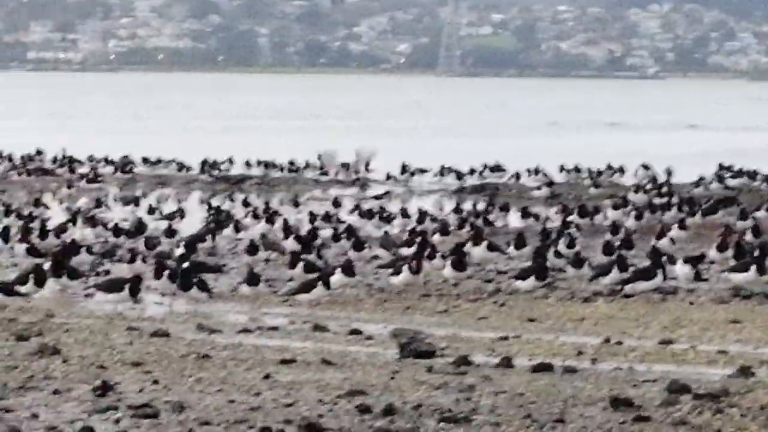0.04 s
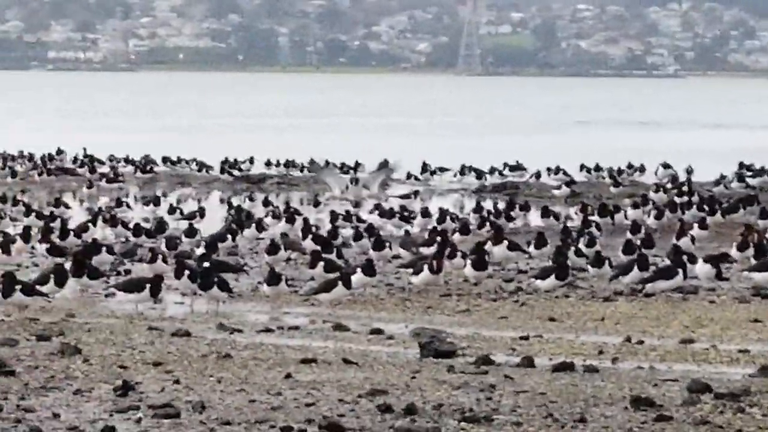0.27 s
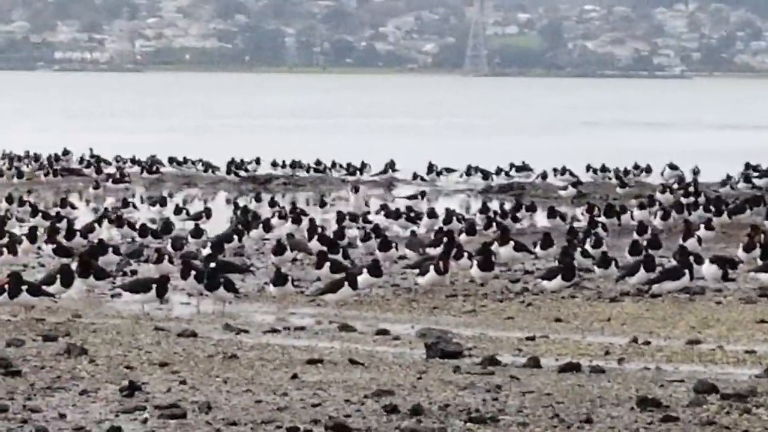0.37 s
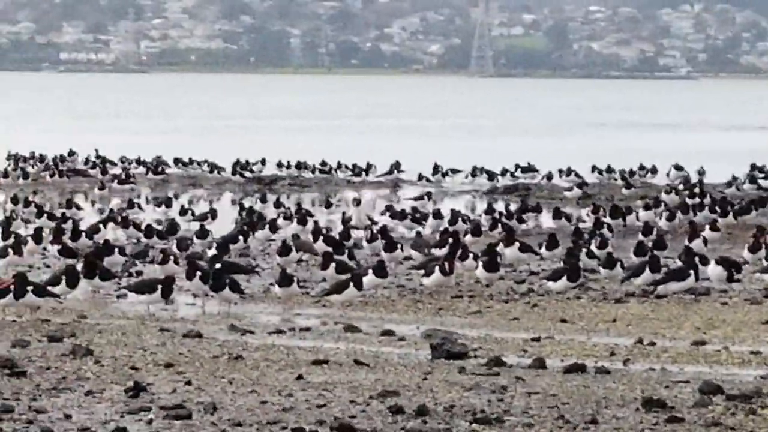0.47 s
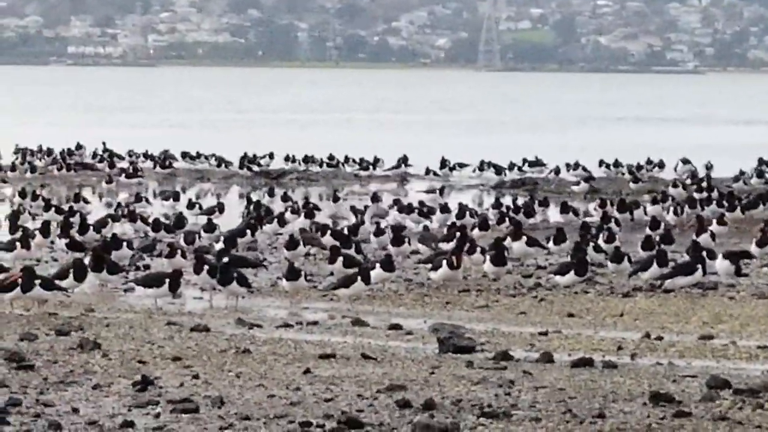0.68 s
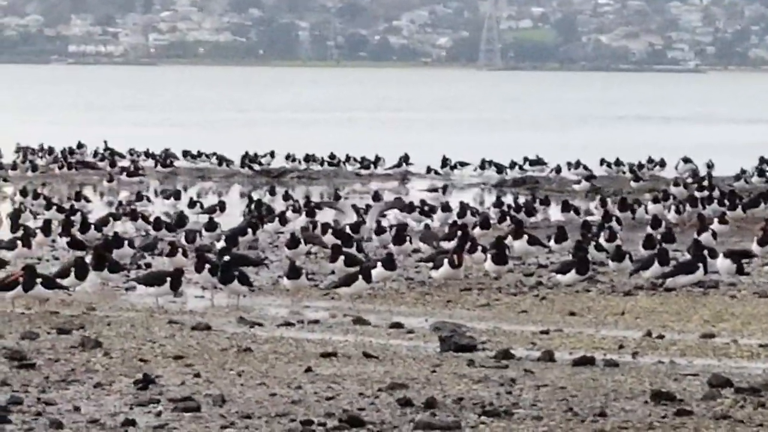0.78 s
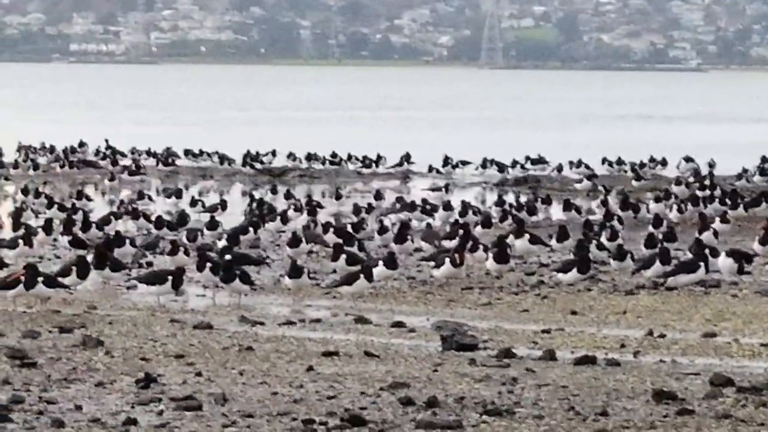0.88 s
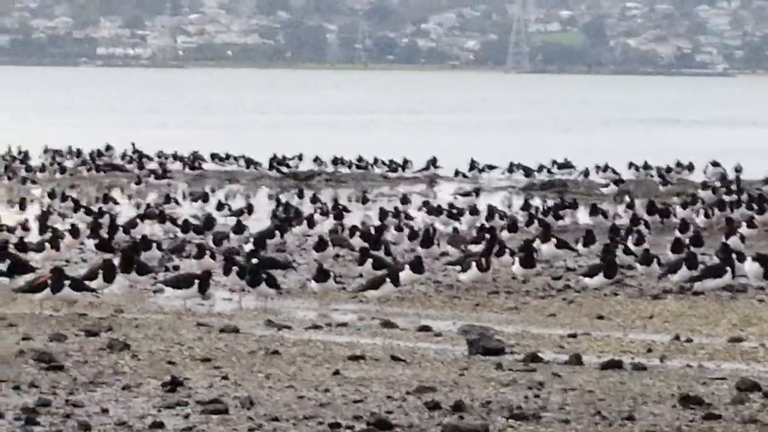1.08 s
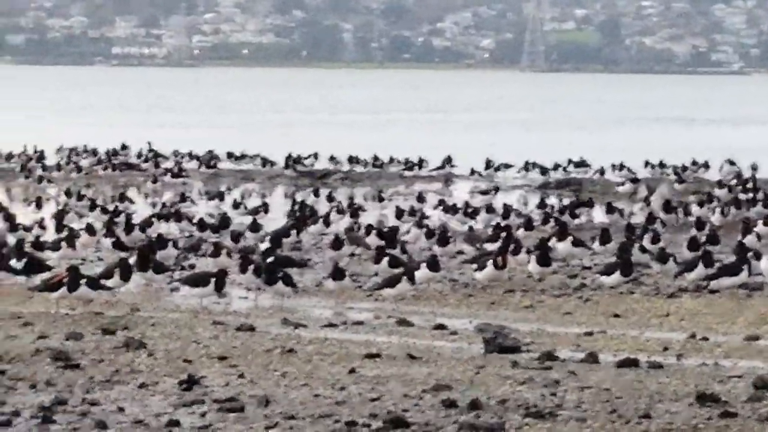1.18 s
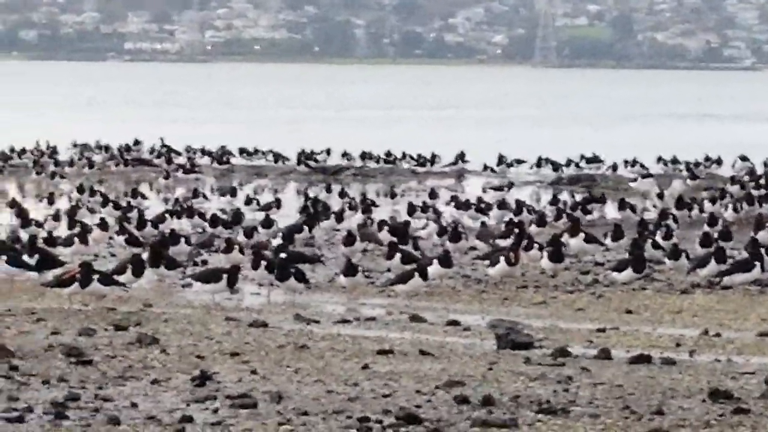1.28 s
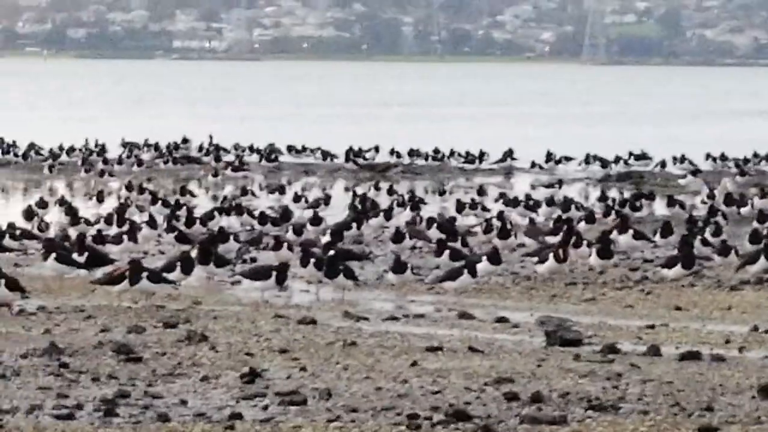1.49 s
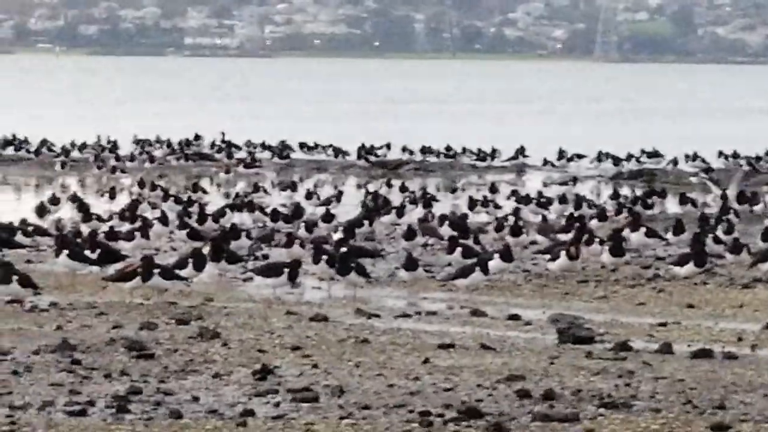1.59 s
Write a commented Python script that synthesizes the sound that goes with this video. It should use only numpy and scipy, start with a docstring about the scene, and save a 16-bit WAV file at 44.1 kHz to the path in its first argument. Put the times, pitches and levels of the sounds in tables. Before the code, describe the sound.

Wading birds pipe a quick run of short, piercing whistles on a stony tidal flat, then one more. Others answer from far out with chirps and lower mewing cries, while light wind rumbles on the microphone.

```python
"""A stony tidal flat with a flock of oystercatchers. Near birds pipe short arched whistles, syrinx
tones that flip up into a high register and drop back. Others answer from far out, with a few lower
mewing cries. The stones scatter each call; bank and shore return a faint long echo. Light wind
rumbles on the microphone over a distant hush, and the camera adds a faint thin whine."""
import sys
import numpy as np
from scipy import signal
from scipy.fft import rfft, irfft, next_fast_len
from scipy.io import wavfile
from scipy.ndimage import uniform_filter1d, map_coordinates

SR = 44100
rng = np.random.default_rng(int(sys.argv[2]) if len(sys.argv) > 2 else 0)


def store_wav(level_fs):
    """Save 16-bit WAV to argv[1]."""
    pcm = np.round(np.clip(np.atleast_2d(level_fs), -1, 1) * 32767)
    wavfile.write(sys.argv[1], SR, pcm.T.astype(np.int16))


N = 72765

# Noise spectra. Each row: frequency in Hz, relative density in dB.
HUSH_SPECTRUM = [(90, 0.5), (170, -2), (215, -6), (300, -1), (400, -16), (650, -13), (2200, -21.5),
                 (6000, -30), (9500, -40), (15000, -45.5)]
WIND_SPECTRUM = [(20, -7), (42, 2), (60, -1), (80, -3), (125, -14), (600, -82)]
# Hush width. Each row: frequency in Hz, left-right correlation.
HUSH_CORRELATION = [(60, 0.82), (250, 0.68), (600, 0.59), (3000, 0.025)]
# Gusts and one lull. Each row: centre in seconds, level over the steady wind in dB.
GUSTS = [(.08, 3.5), (.4, 5.5), (.49, -12), (.96, 6), (1.08, 6), (1.289, 8), (1.379, 8)]
# Distant calls. Each row: start and length in seconds, start, middle and end pitch in Hz, level in dB.
FAR_CALLS = [(-0.02, 0.22, 2100, 2014, 2040, -70), (.018, 0.036, 2150, 2364, 2320, -60.5),
             (.284, 0.027, 1760, 1675, 1500, -62), (.35, 0.038, 1780, 1733, 1500, -59),
             (.59, 0.042, 2000, 2123, 1910, -62), (.744, 0.028, 2740, 2560, 2130, -54),
             (.868, 0.046, 2080, 2670, 2030, -59.5), (1.25, 0.052, 1750, 2478, 1980, -58),
             (1.245, 0.057, 2250, 2043, 2380, -64), (1.622, 0.07, 2200, 2610, 2330, -61)]
MEWS = [(-0.02, .16, 1113, 1071, 1000, -70.5), (.485, 0.058, 1046, 1330, 1560, -64),
        (.545, 0.106, 1585, 1521, 1440, -67), (.63, 0.06, 1470, 1330, 1003, -58),
        (.74, 0.041, 1350, 1292, 1230, -62), (1.244, 0.044, 1170, 1314, 964, -56),
        (1.29, 0.128, 1049, 929, 1082, -69), (1.43, 0.074, 985, 1194, 1185, -56.5),
        (1.488, 0.081, 1095, 1290, 966, -55)]
# One near call each. Each row: time in seconds, pitch in Hz, fundamental and octave levels in dB.
PIP = [(0.224, 1970, -60.5, -76), (0.236, 2787, -39, -44.5), (0.243, 2784, -45, -42.5),
       (0.25, 2740, -43, -45), (0.255, 2640, -66, -63)]
PEEP = [(0.317, 2250, -53, -60), (0.321, 2384, -42, -50), (0.325, 2630, -26.5, -44),
        (0.328, 3024, -42.5, -46.5), (0.338, 3080, -40, -35.5), (0.352, 2970, -41, -43),
        (0.36, 2690, -36.5, -47), (0.364, 2570, -49, -68)]
HELD_PEEP = [(0.386, 1824, -69, -53.5), (0.4, 2201, -41.5, -43.5), (0.409, 2348, -50, -38),
             (0.414, 2842, -35.5, -61), (0.427, 3116, -41, -47.5), (0.48, 3092, -40, -61),
             (0.5, 2986, -38, -52)]
KLEE_OO = [(0.451, 2245, -46, -47.5), (0.459, 2568, -29, -36.5), (0.463, 3114, -40, -45),
           (0.471, 3156, -63, -32), (0.48, 3041, -30.5, -45), (0.487, 2590, -31, -42),
           (0.492, 2476, -38, -43.5), (0.508, 2338, -48.5, -45.5), (0.533, 2332, -44.5, -44),
           (0.547, 2298, -45.5, -47.5), (0.556, 2014, -52, -57)]
YELP = [(0.713, 2064, -60, -72), (0.717, 2130, -41.5, -47), (0.726, 2100, -49.5, -53),
        (0.745, 1643, -51, -67)]
LATE_KLEEP = [(1.028, 1920, -72, -68), (1.046, 2290, -50, -48), (1.058, 2490, -43, -53),
              (1.065, 3110, -38, -58), (1.078, 3260, -41, -55), (1.091, 3305, -47, -57),
              (1.108, 3110, -48, -61), (1.118, 2780, -41, -53), (1.126, 2400, -42, -52),
              (1.135, 2230, -57, -62)]
# Near birds. Each row: call, then in dB: fundamental pan, octave pan, third harmonic re the mean of
# those two harmonics, fall per further harmonic, level sent to the shore at the pitch crest.
NEAR_CALLS = [(PIP, -1.1, 8.2, -21, 25, -51), (PEEP, -3, -3, -19.5, 15, -37.5),
              (HELD_PEEP, -4, 4, -14.5, 4.7, -38.5), (KLEE_OO, -1, -1.1, -11.5, 9.5, -37.5),
              (YELP, 4.6, -2.2, -9.5, 11.6, -46.5), (LATE_KLEEP, -3.6, 7.7, -11, 4.4, -33)]
# Near harmonics 3 to 5. Each row: frequency in Hz, gain in dB.
UPPER_COLOUR = [(6700, -10), (7550, 7.5), (8400, -9), (9600, 9), (10600, -11), (12700, 4.5), (14200, -16)]
# Their balance. Each row: frequency in Hz, pan (left minus right) in dB.
UPPER_PAN = [(6000, -1), (7000, 3), (9000, 19)]
# Colour of all echoes. Each row: frequency in Hz, gain in dB.
ECHO_COLOUR = [(3000, 1), (11000, -8.5)]
# Send gain and decay table. Each row: frequency in Hz, T60 in seconds.
NEAR_SCATTER_DB, STONES_T60 = -7.5, [(2000, 0.094), (12000, 0.047)]
SHORE_DB, SHORE_T60 = -15.5, [(3000, 0.51), (12000, 0.43)]

FAR_SCATTER_DB, MEW_SCATTER_DB = -4, -10
BANK_DELAY_S, BANK_DB, BANK_T60_S = 0.18, -23.5, 0.51
FLUTTER_DB, RIGHT_PORT_LEAD_RAD = 1.3, 1.42
NEAR_JITTER, FAR_JITTER = 0.004, 0.0294  # fractions of pitch
ATTACK_S, RELEASE_S = 0.00081, 0.0046
SENT_DB_PER_OCTAVE, SENT_FALL_DB, SENT_PITCH_RATIO = 18, 8, 1.012


def amp(db):
    """Decibels to gain."""
    return 10 ** (np.asarray(db) / 20)


def along(points, hz):
    """Interpolate (Hz, value) rows on a log frequency axis."""
    knots_hz, values = np.transpose(points)
    return np.interp(np.log(hz + 1), np.log(knots_hz + 1), values)


def wobble(rate_hz):
    """Smooth random curve, rate_hz knots a second."""
    knots = rng.standard_normal(int(N * rate_hz / SR) + 4)
    return map_coordinates(knots, [np.arange(N) * rate_hz / SR])


def filtered(x, response):
    """Apply a response given as a function of Hz."""
    size = next_fast_len(N + SR // 2)
    return irfft(rfft(x, size) * response(np.fft.rfftfreq(size, 1 / SR)), size)[..., :N]


def panned(pan_db):
    """Constant-power stereo gains; positive is left."""
    gains = amp(np.array([pan_db, -pan_db]).reshape(2, -1) / 2)
    return gains / np.sqrt(np.mean(gains ** 2, axis=0))


def gate(start_s, end_s, rise_s, fall_s):
    """Smooth rise, hold and fall."""
    t = np.arange(N) / SR
    ramp = np.minimum((t - start_s) / rise_s, (end_s - t) / fall_s)
    return np.sin(np.pi / 2 * np.clip(ramp, 0, 1)) ** 2


def stereo_noise(spectrum, correlation):
    """Coloured stereo noise of rms 1."""
    def mid_side_gains(hz):
        angle = np.arccos(np.clip(along(correlation, hz), -1, 1)) / 2
        return amp(along(spectrum, hz)) * [np.cos(angle), np.sin(angle)]

    mid, side = filtered(rng.standard_normal((2, N)), mid_side_gains)
    noise = np.array([mid + side, mid - side])
    return noise / np.sqrt(np.mean(noise ** 2) + 1e-20)


def hush(level_db=-56.5):
    """Steady distant noise, wider in the treble."""
    return amp(level_db) * stereo_noise(HUSH_SPECTRUM, HUSH_CORRELATION)


def wind(steady_db=-53, pan_db=-9.5, gust_s=0.028):
    """Soft gusts rumble on the microphone, more on the right."""
    t = np.arange(N) / SR
    level_db = steady_db + sum(db * np.exp(-((t - centre_s) / gust_s) ** 2) for centre_s, db in GUSTS)
    return amp(level_db) * panned(pan_db) * stereo_noise(WIND_SPECTRUM, correlation=[(50, 0.085)])


def echo(x, t60_table):
    """Diffuse reflections: a noise tail per side, decaying by the T60 at each frequency."""
    hz, t, bins = signal.stft(rng.standard_normal((2, SR)), SR, nperseg=256)
    decay = amp(-60 * t / along(t60_table, hz)[:, None])
    tail = signal.istft(bins * decay, SR, nperseg=256)[1]
    wet = signal.fftconvolve(x, tail / np.linalg.norm(tail[0]), axes=1)[:, :N]
    return filtered(wet, lambda hz: amp(along(ECHO_COLOUR, hz)))


def bank_echo(x):
    """One late, widely smeared reflection off the bank."""
    smeared = echo(x, [(1, BANK_T60_S)])
    return amp(BANK_DB) * filtered(smeared, lambda hz: np.exp(-2j * np.pi * hz * BANK_DELAY_S))


def whistle(pitch_hz, harmonics, jitter):
    """Unsteady syrinx tone. Each harmonic, (level dB, pan dB), flutters separately on each side."""
    phase = 2 * np.pi * np.cumsum(pitch_hz * (1 + jitter * wobble(1500))) / SR
    mic_phase = np.array([[0], [RIGHT_PORT_LEAD_RAD]])
    tone = np.zeros((2, N))
    for k, (level_db, pan_db) in enumerate(harmonics, 1):
        flutter_db = FLUTTER_DB * np.array([wobble(200) for side in "LR"])
        tone += amp(level_db + flutter_db) * panned(pan_db) * np.sin(k * phase + mic_phase)
    return np.sqrt(2) * tone


def chatter(count, level_db=-69.5, typical_hz=1816, typical_s=0.0392):
    """Faint random calls from the rest of the flock, as rows for far_birds."""
    arch = np.array([0.85, 1, 0.85])
    return [(when * N / SR, typical_s * (0.5 + length), *(typical_hz * 2 ** (pitch - 0.5) * arch),
             level_db) for when, length, pitch in rng.random((count, 3))]


def far_birds(calls, octave_db, pan_db):
    """Distant calls: rough parabolic glides, dulled to two harmonics."""
    t, out = np.arange(N) / SR, np.zeros((2, N))
    for start_s, length_s, *contour_hz, level_db in calls:
        progress = np.clip((t - start_s) / length_s, 0, 1)
        pitch_hz = np.polyval(np.polyfit([0, 0.5, 1], contour_hz, 2), progress)
        tone = whistle(pitch_hz, [(level_db, pan_db), (level_db + octave_db, pan_db)], FAR_JITTER)
        fade_s = 0.22 * length_s
        out += tone * gate(start_s, start_s + length_s, fade_s, fade_s)
    return out


def near_birds():
    """Piercing calls: the direct sound, and that sent to the shore, where the crest carries best."""
    t, direct, sent = np.arange(N) / SR, np.zeros((2, N)), np.zeros((2, N))
    for call, low_pan_db, octave_pan_db, third_db, fall_db, crest_db in NEAR_CALLS:
        times_s, *columns = np.transpose(call)
        pitch_hz, low_db, octave_db = [uniform_filter1d(np.interp(t, times_s, column), size=110)
                                       for column in columns]
        harmonics = [(low_db, low_pan_db), (octave_db, octave_pan_db)]
        for k in range(3, 6):
            upper_db = (low_db + octave_db) / 2 + third_db - fall_db * (k - 3)
            colour_db = along(UPPER_COLOUR, k * pitch_hz)
            harmonics.append((upper_db + colour_db, along(UPPER_PAN, k * pitch_hz)))
        envelope = gate(times_s[0] - ATTACK_S / 2, times_s[-1] + RELEASE_S / 2, ATTACK_S, RELEASE_S)
        direct += envelope * whistle(pitch_hz, harmonics, NEAR_JITTER)
        sent_db = crest_db + SENT_DB_PER_OCTAVE * np.log2(pitch_hz / pitch_hz.max())
        sent_harmonics = [(sent_db - SENT_FALL_DB * k, 0) for k in range(3)]
        sent += envelope * whistle(pitch_hz * SENT_PITCH_RATIO, sent_harmonics, NEAR_JITTER)
    return direct, sent


def scene():
    """The flock, scattered by stones and echoed by bank and shore, over wind and hush."""
    near, sent = near_birds()
    far = far_birds(FAR_CALLS + chatter(count=20), octave_db=-21, pan_db=7)
    mews = far_birds(MEWS, octave_db=-27, pan_db=3)
    onto_stones = amp(NEAR_SCATTER_DB) * near + amp(FAR_SCATTER_DB) * far + amp(MEW_SCATTER_DB) * mews
    outward = sent + far + mews
    stones = echo(onto_stones, STONES_T60)
    bank = bank_echo(outward)
    shore = amp(SHORE_DB) * echo(outward, SHORE_T60)
    return near + far + mews + stones + bank + shore + wind() + hush()


def record(dry):
    """The camera adds its faint whine and limits the band."""
    whine_hz, whine_db, cutoff_hz = 12920, -91.5, 15100
    whine = np.sqrt(2) * amp(whine_db) * np.sin(2 * np.pi * whine_hz * np.arange(N) / SR)
    return filtered(dry + whine, lambda hz: hz < cutoff_hz)


dry = scene()
out = record(dry)
store_wav(out)
```